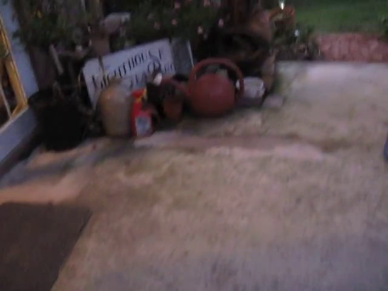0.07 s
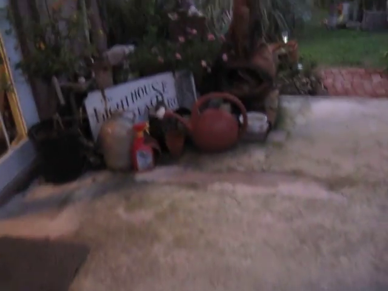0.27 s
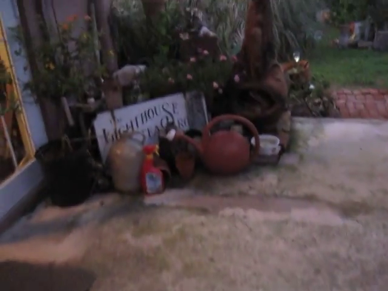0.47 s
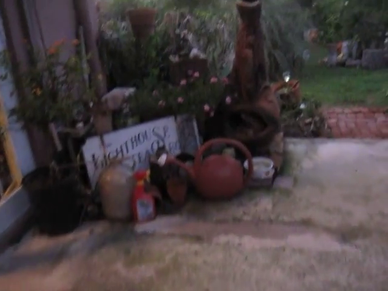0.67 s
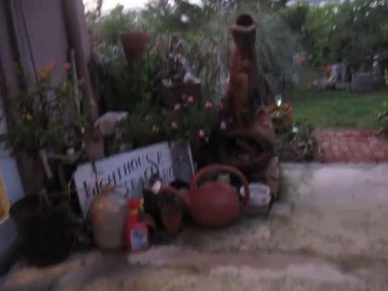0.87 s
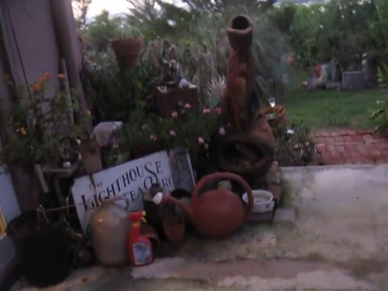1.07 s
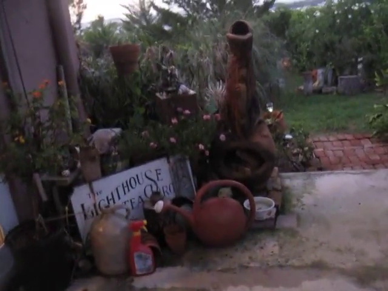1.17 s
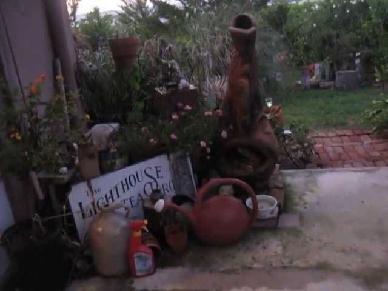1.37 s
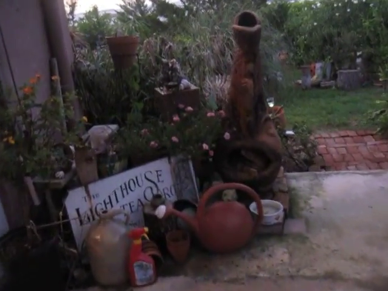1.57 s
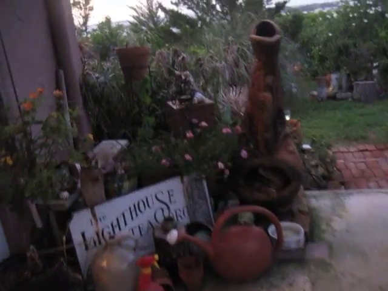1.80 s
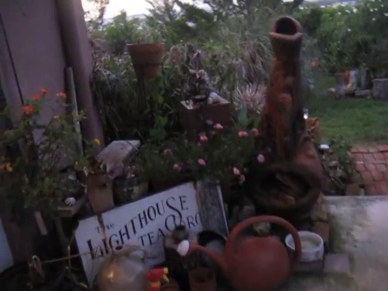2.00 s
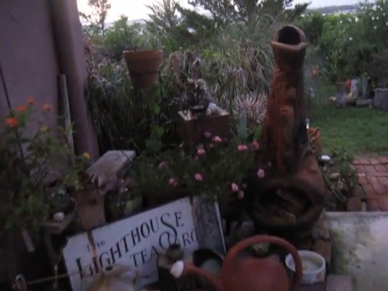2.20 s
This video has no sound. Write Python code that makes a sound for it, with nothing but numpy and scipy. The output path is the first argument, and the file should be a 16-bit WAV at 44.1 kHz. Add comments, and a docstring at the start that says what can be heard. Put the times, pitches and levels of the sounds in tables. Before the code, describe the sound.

Small tree frogs whistle and peep continuously in a garden at dusk, with thin cricket chirps above them. The nearest frog gives two rising whistles, while shoes scuff faintly on a patio and the microphone is softly bumped.

```python
"""A garden at dusk. From the start, small tree frogs whistle near 3.7 kHz and peep near 2 kHz, crickets
chirp with their wings near 7.4 kHz, and many more frogs blur into a far chorus. A shoe scrapes on the
gritty patio, then the nearest frog gives a rising whistle at 0.5 s. Around 1 s the person standing
there softly bumps the camera. The near frog whistles again at 1.6 s, and the shoes shuffle once more."""
import sys
import numpy as np
from scipy import signal
from scipy.fft import rfft, irfft
from scipy.io import wavfile
from scipy.ndimage import uniform_filter1d

SR = 44100
rng = np.random.default_rng(int(sys.argv[2]) if len(sys.argv) > 2 else 0)


def dump_mix(stems):
    """Bounce the given channels to the path in sys.argv[1] as a 16-bit WAV at rate SR."""
    frames = np.atleast_2d(stems).T  # one column per channel
    limited = np.clip(frames, -1, 1)  # hard clip at full scale
    pcm = np.round(limited * 32767).astype(np.int16)
    wavfile.write(sys.argv[1], SR, pcm)


N = 99092

# The hiss of the evening air. Each row: frequency in Hz, level in dB.
AIR_SPECTRUM = [(20, -21.5), (60, 1.5), (85, -9), (122, -2.5), (190, -6.5), (400, -7), (750, -4.5),
                (1250, -7.5), (1600, -11), (2100, -8), (2800, -13), (3700, -1.5), (4800, -15.5),
                (6600, -18.5), (8500, -24), (11800, -23.5), (14000, -33.5), (15500, -43.5)]
# A distant hum. Each row: pitch in Hz, level in dB, fade in dB per second.
HUM_TONES = [(120.3, -62, 0.5), (736, -60, 3.5)]
# The farthest callers, merged into a wash. Each row: frequency in Hz, level in dB.
WASH_SPECTRUM = [(1750, -56), (1900, -10), (2040, -5), (2200, -8), (2450, -22), (3100, -25.5), (3350, -7.5),
                 (3550, -11), (3800, 0), (4000, -12), (4250, -16), (4600, -36), (5500, -53)]
# Groups of far callers. Each row: middle pitch in Hz, pitch range in Hz, calls per second,
# call length in seconds, wobble in Hz, level in dB.
FAR_GROUPS = [(3719, 520, 77, .12, 45, -37.5), (4005, 280, 16, 0.036, 74, -50),
              (2082, 217.7, 83, 0.055, 29.3, -48), (7360, 800, 60, 0.029, 47, -56)]
# Soft bumps on the camera. Each row: start in seconds, pitch in Hz, level in dB.
CAMERA_BUMPS = [(0.872, 56.4, -37.5), (0.93, 60, -40), (0.996, 120, -44), (1.039, 113, -40),
                (1.068, 65, -41), (1.101, 86, -33), (1.14, 159, -35.5), (1.197, 112, -33),
                (1.213, 64.8, -36.5), (1.252, 83, -44)]
# Light knocks. Each row: start in seconds, level in dB.
LIGHT_KNOCKS = [(1.093, -41.5), (1.3644, -34.5)]
# The tones a knock rings with. Each row: pitch in Hz, level in dB, seconds to fade by 60 dB.
KNOCK_TONES = [(351, 1.5, 0.027), (505, 0, 0.027), (600, 2.5, 0.023), (803, -2.5, 0.062), (934, 0.5, 0.04),
               (1090, 4, 0.036)]
# Shoe scuffs. Each row: start in seconds, length in seconds, level in dB, brightness in dB per octave.
SHOE_SCUFFS = [(0.066, 0.061, -42, -2.5), (0.089, 0.054, -42, -2), (1.148, 0.025, -51, 6),
               (1.473, 0.04, -48, 5), (1.659, 0.071, -40, -2.5), (1.721, 0.11, -47.5, 0),
               (2.049, 0.018, -40.5, -4.5), (2.059, 0.067, -41.5, -2), (2.069, 0.15, -41.5, -13)]
# The noise of a scuff. Each row: frequency in Hz, level in dB.
SCUFF_SPECTRUM = [(30, -58), (200, -26), (450, -17.5), (800, -2.5), (1300, -8), (1800, 2.5), (2700, 3),
                  (5000, 5), (8000, -2.5), (12000, -14.5), (15500, -49)]
# The tones of a dragged sole. Each row: pitch in Hz, level in dB, seconds to fade by 60 dB.
SOLE_TONES = [(1610, -61, 0.052), (1690, -38.5, 0.11), (1860, -36.5, 0.037)]
# Grit snapping under a sole. Each row: start, rise time and decay time in seconds, level in dB,
# brightness in dB per octave.
GRIT_SNAPS = [(.2152, 0.00055, 0.0023, -30, -4), (0.3097, 0.00055, 0.0019, -37, 1),
              (1.2985, 0.0083, 0.013, -28, 2)]
# The noise of a snap. Each row: frequency in Hz, level in dB.
SNAP_SPECTRUM = [(500, -26), (1500, -10), (3000, 3), (6000, 1), (7500, -6.5), (11500, -12), (14000, -27),
                 (15500, -40)]
# Cricket chirps. Each row: start in seconds, wing strokes (to be rounded), pitch in Hz, level in dB.
CRICKET_CHIRPS = [(-.08, 3.35, 7480, -42.5), (0.091, 4.7, 7250, -44), (.273, 3.94, 7600, -36),
                  (0.269, 4.3, 7356, -34.5), (0.386, 5, 7490, -45), (0.476, 3, 7160, -57),
                  (.648, 4.45, 7360, -34.5), (0.652, 3.6, 7170, -44), (0.722, 4.4, 7650, -40.5),
                  (.805, 2, 7540, -43), (.828, 2.1, 7620, -40), (0.993, 3.6, 7550, -45),
                  (1.013, 4, 7060, -43), (1.056, 4.7, 7290, -37), (1.381, 4.2, 7564, -32),
                  (1.372, 4.2, 7140, -46), (1.433, 3.2, 7340, -39.5), (1.54, 4, 7465, -43),
                  (1.53, 4.6, 7160, -46.5), (1.777, 4.1, 7600, -39), (1.794, 3.9, 7387, -35.5),
                  (1.92, 2.55, 7660, -49.5), (1.96, 3.2, 7100, -56), (2.124, 4.2, 7160, -41.5),
                  (2.168, 4.3, 7400, -39), (2.218, 3.4, 7620, -34.5)]
# Low frog peeps. Each row: start in seconds, length in seconds, pitch in Hz, level in dB,
# third harmonic in dB relative to the main tone.
FROG_PEEPS = [(-.02, 0.049, 1987, -35, -22), (.015, 0.081, 2189, -40, -27), (0.071, 0.065, 2077, -37, -28),
              (0.154, 0.058, 2125, -38.5, -35), (0.412, 0.07, 1955, -35.5, -35),
              (0.422, 0.051, 2060, -29, -19), (0.672, 0.075, 2042, -39, -25),
              (0.867, 0.063, 1976, -35, -32), (0.886, 0.052, 2053, -34.5, -34),
              (.925, 0.069, 2123, -39.5, -30), (1.056, 0.058, 1981, -39.5, -19),
              (1.219, 0.02, 2133, -33, -44), (1.312, 0.09, 1925, -40.5, -28),
              (1.357, 0.067, 2072, -41.5, -35), (1.51, 0.066, 2043, -35, -11.5),
              (1.559, 0.021, 2122, -30, -29), (1.603, 0.037, 2040, -40, -26),
              (1.822, 0.041, 2065, -34.5, -26), (1.949, 0.056, 1970, -33.5, -27),
              (2.192, 0.049, 2017, -43, -10.5)]
# Whistles of neighbouring frogs. Each row: start in seconds, length in seconds, final pitch in Hz,
# slow rise in Hz, quick opening scoop in Hz (negative ones fall), level in dB.
FROG_WHISTLES = [(-.09, 0.15, 3554, 40, 0, -24), (-.08, 0.1, 3780, 22.5, -3, -23),
                 (.04, .18, 3660, 93.5, 15, -23), (.135, 0.14, 3840, 0, 2, -27.5),
                 (0.251, 0.169, 3756, 59.5, 7, -32.5), (.28, 0.14, 3844, 6, -3, -36.5),
                 (0.443, 0.075, 4130, 37, 9, -36), (0.467, 0.03, 4267, 108, 3, -36.5),
                 (0.485, .23, 3527, 85, 437.5, -37.5), (.79, 0.14, 3766, 7, -9, -22.5),
                 (.925, 0.21, 3517, 132, 331, -26.5), (.915, 0.19, 3860, 79.5, -13, -31),
                 (0.997, 0.11, 3684, 19, 2, -33), (1.057, 0.075, 4010, 82, 5, -34),
                 (1.075, 0.18, 3809, 3, -1.5, -29), (1.118, 0.14, 3640, 73, 364.5, -27),
                 (1.265, 0.056, 3660, 3, -8, -28), (1.29, 0.21, 3857, 28, 6, -39),
                 (1.535, 0.06, 4200, 120, 0, -40.5), (1.555, 0.036, 3610, 75, 20, -31),
                 (1.63, 0.19, 3766, 57.5, 7, -25.5), (1.86, 0.11, 3837, -5.5, 8, -34),
                 (1.975, 0.065, 3860, -7, -18, -29), (2.008, 0.24, 3548, 149, 343, -30.5),
                 (2.2, 0.23, 3654, 45, -7, -34.5)]
# The nearest frog. Each row: start in seconds, length in seconds, first pitch in Hz, rise in Hz.
NEAR_WHISTLES = [(0.476, 0.181, 3882, 171), (1.587, 0.16, 3890, 192)]
# Its loudness, one list per whistle. Each point: time in the scene in seconds, level in dB.
NEAR_LOUDNESS = [
    [(.485, -32), (.503, -27.5), (.52, -20), (.543, -16.5), (.56, -22), (.571, -58), (.581, -15.5),
     (.597, -18), (.609, -19.5), (.618, -15.5), (.628, -31), (.665, -34.5)],
    [(1.585, -29), (1.606, -31), (1.63, -20.5), (1.65, -16), (1.672, -27), (1.691, -39), (1.699, -15.5),
     (1.712, -21.5), (1.727, -32.5), (1.765, -52)],
]


def undb(db):
    """Turn decibels into a gain."""
    return 10 ** (np.asarray(db) / 20)


def unit(x):
    """Scale a sound to an average (rms) level of 1."""
    return x / np.sqrt(np.mean(x ** 2) + 1e-20)


def clock(length):
    """The time of each sample, in seconds."""
    return np.arange(max(int(length * SR), 8)) / SR


def add(out, start, x):
    """Mix x into out at a start time in seconds."""
    i = int(start * SR)
    a, b = max(i, 0), min(i + len(x), N)
    if b > a:
        out[a:b] += x[a - i:b - i]


def tone(hz, overtone_db=-99, order=2):
    """A sine wave that follows a changing pitch, with one overtone."""
    phase = 2 * np.pi * np.cumsum(hz) / SR
    return np.sqrt(2) * (np.sin(phase) + undb(overtone_db) * np.sin(order * phase))


def swell(progress, attack, release):
    """Rise, hold and fall as progress goes from 0 to 1; attack and release are shares of the length."""
    rise = np.sin(np.pi / 2 * np.clip(progress / attack, 0, 1))
    fall = np.sin(np.pi / 2 * np.clip((1 - progress) / release, 0, 1))
    return rise * fall


def die_away(t, fade_s):
    """A fade that drops 60 dB in fade_s seconds."""
    return np.exp(-np.log(1000) * t / fade_s)


def waver(t, rate, count=64):
    """A random drift of size about 1, with rate new values a second."""
    return np.interp(t * rate, np.arange(count), rng.standard_normal(count))


def noise(spectrum, tilt_db=0):
    """Noise at level 1, shaped by a spectrum and tilted by tilt_db per octave."""
    octave = np.log2(np.maximum(np.fft.rfftfreq(N, 1 / SR), 1))
    hz, db = np.array(spectrum).T
    gain = undb(np.interp(octave, np.log2(hz), db) + tilt_db * octave)
    return unit(irfft(rfft(rng.standard_normal(N)) * gain, N))


def garden(x, echo_db):
    """The direct sound plus a short echo scattered by walls and leaves."""
    t = np.arange(SR // 2) / SR
    tail = rng.standard_normal(len(t)) * die_away(t, fade_s=0.16)
    return x + undb(echo_db) * signal.fftconvolve(x, tail / np.linalg.norm(tail))[:N]


def evening_air():
    """A soft, steady hiss."""
    return undb(-45) * noise(AIR_SPECTRUM)


def distant_hum():
    """Two weak tones that waver and slowly fade."""
    t = np.arange(N) / SR
    return sum(undb(db - fade_db * t + 2 * waver(t, 9.2)) * tone(hz + 4 * waver(t, 20))
               for hz, db, fade_db in HUM_TONES)


def far_chorus(count=256):
    """Far calls at random times and pitches, blurred by the garden, over a gently swelling wash."""
    total = undb(-41 + 1.5 * waver(np.arange(N) / SR, 11)) * noise(WASH_SPECTRUM)
    for hz, range_hz, rate, length, wobble_hz, db in FAR_GROUPS:
        out, t = np.zeros(N), clock(length)
        delay, detune = rng.random(count), rng.random(count) - .5
        wobble = [waver(t, 251) for _ in range(count)]
        for k in range(min(int(rate * (N / SR + length)) + 1, count)):
            pitch = hz + range_hz * detune[k] + 50 * (t / length - .5) + wobble_hz * wobble[k]
            add(out, (k + delay[k]) / rate - length, swell(t / length, 0.076, 0.64) * tone(pitch))
        total += undb(db) * unit(garden(out, echo_db=-0.5))
    return total


def bumps_and_knocks(bump_s=0.015):
    """Handling the camera makes dull bumps of a wave or two, and light hollow knocks."""
    out, t = np.zeros(N), clock(bump_s)
    for start, hz, db in CAMERA_BUMPS:
        add(out, start, undb(db) * swell(t / bump_s, 0.26, 0.87) * np.sin(2 * np.pi * hz * t))
    t = clock(.1)
    for start, db in LIGHT_KNOCKS:
        for hz, tone_db, fade_s in KNOCK_TONES:
            ring = np.sin(2 * np.pi * (hz * t + rng.random())) * die_away(t, fade_s)
            add(out, start, undb(db + tone_db) * ring * np.minimum(t / 0.00025, 1))
    return out


def grit(spread_db):
    """Grains of unequal size, half a millisecond each, make the loudness flicker."""
    sizes = np.minimum(np.repeat(rng.exponential(size=N), 24)[:N], 4)
    return unit(uniform_filter1d(undb(spread_db * sizes), size=12))


def scuffing_shoes():
    """Soles rub over grit, each scuff with a quick start and a longer fade."""
    out, t = np.zeros(N), np.arange(N) / SR
    for start, length, db, bright_db in SHOE_SCUFFS:
        progress = t / length
        push = np.minimum(progress / 0.028, 1) * undb(-6.5 * np.minimum(progress, 10) ** 2)
        add(out, start, undb(db) * push * grit(spread_db=4) * noise(SCUFF_SPECTRUM, bright_db))
    return out


def dragged_sole(start=0.078, length=0.081, slips_per_s=350, fade_db=-14.5):
    """A sole catches and slips at uneven moments, and each slip rings a few tones."""
    out, t, ring_t = np.zeros(N), clock(length), clock(.1)
    slip_rate = slips_per_s * np.exp(.5 * waver(t, 400))
    slips = np.diff(np.floor(np.cumsum(slip_rate) / SR), prepend=0)  # one click per slip
    for hz, db, fade_s in SOLE_TONES:
        ring = np.sin(2 * np.pi * hz * ring_t) * die_away(ring_t, fade_s)
        rasp = unit(signal.fftconvolve(slips, ring)[:len(t)])
        add(out, start, undb(db + fade_db * t / length) * swell(t / length, 0.22, 0.23) * rasp)
    return out


def snapping_grit():
    """Grains break under a sole and crackle away."""
    out, t = np.zeros(N), np.arange(N) / SR
    for start, attack, decay, db, bright_db in GRIT_SNAPS:
        burst = np.minimum(t / attack, 1) * np.exp(-t / decay)
        add(out, start, undb(db) * burst * grit(spread_db=2) * noise(SNAP_SPECTRUM, bright_db))
    return out


def crickets(stroke_s=0.025, spacing_s=0.035, sag_hz=70, step_hz=14.7, wobble_hz=45):
    """Each wing stroke is one pulse that sags in pitch; the next stroke is a little higher."""
    out, t = np.zeros(N), clock(stroke_s)
    for start, count, hz, db in CRICKET_CHIRPS:
        for k in range(round(count)):
            from_middle = k - (count - 1) / 2
            pitch = hz + step_hz * from_middle - sag_hz * (t / stroke_s - .5) + wobble_hz * waver(t, 582)
            loud = undb(db - 0.04 * from_middle + rng.standard_normal()) * swell(t / stroke_s, 0.32, 0.27)
            when = start + k * spacing_s + 0.0015 * rng.standard_normal()
            add(out, when, loud * tone(pitch, overtone_db=-38))
    return garden(out, echo_db=-6)


def peeping_frogs(sag_hz=25, second_db=-14):
    """Short notes that sag a little in pitch, with a second and a third harmonic."""
    out = np.zeros(N)
    for start, length, hz, db, third_db in FROG_PEEPS:
        t = clock(length)
        pitch = hz - sag_hz * (t / length - .5) + 12 * waver(t, 168)
        voice = tone(pitch, third_db, order=3) + undb(second_db) * tone(2 * pitch)
        add(out, start, undb(db) * swell(t / length, 0.15, 0.32) * voice)
    return garden(out, echo_db=-1)


def whistling_frogs(scoop_s=0.013, wobble_hz=8.9, flutter_db=2.5):
    """Whistles that hold or creep up to their final pitch; a few open with a quick upward scoop."""
    out = np.zeros(N)
    for start, length, hz, rise_hz, scoop_hz, db in FROG_WHISTLES:
        t = clock(length)
        glide = hz - rise_hz * (1 - t / length) ** 2 - scoop_hz * np.exp(-t / scoop_s)
        pitch = glide + wobble_hz * waver(t, 69.5)
        loud = undb(db - flutter_db * waver(t, 75)) * swell(t / length, 0.27, 0.48)
        add(out, start, loud * tone(pitch, overtone_db=-35.5))
    return garden(out, echo_db=-10)


def near_frog():
    """Almost pure whistles that climb ever faster; as heard, their level dips sharply and recovers several
    times."""
    out = np.zeros(N)
    for (start, length, hz, rise_hz), levels in zip(NEAR_WHISTLES, NEAR_LOUDNESS):
        t = clock(length)
        when, db = np.array(levels).T
        flutter = uniform_filter1d(np.interp(start + t, when, undb(db)), size=160)
        pitch = hz + rise_hz * (t / length) ** 2.04
        add(out, start, flutter * swell(t / length, .1, .06) * tone(pitch, overtone_db=-44))
    return garden(out, echo_db=-22)


def scene():
    """The animals and the person's small noises over the evening air, in one channel."""
    animals = near_frog() + whistling_frogs() + peeping_frogs() + crickets() + far_chorus()
    person = scuffing_shoes() + dragged_sole() + snapping_grit() + bumps_and_knocks()
    return (animals + person + distant_hum() + evening_air())[None]


def record(dry):
    """The camera cuts the treble above 15.7 kHz."""
    return signal.sosfilt(signal.ellip(10, .2, 80, 15700, fs=SR, output="sos"), dry)


dry = scene()
out = record(dry)
dump_mix(out)
```